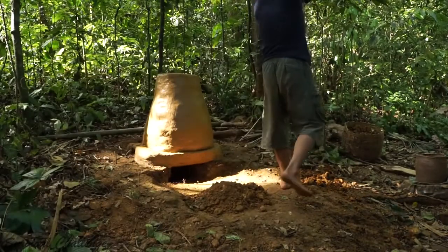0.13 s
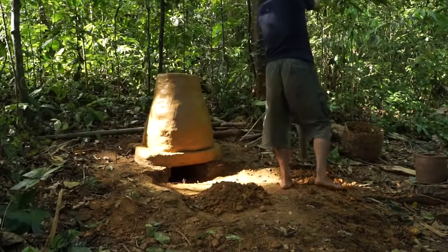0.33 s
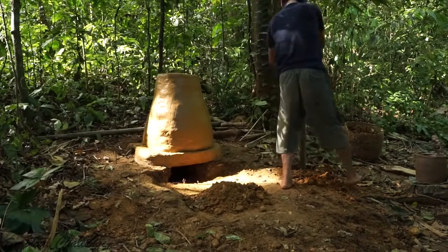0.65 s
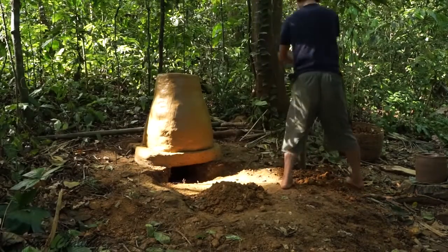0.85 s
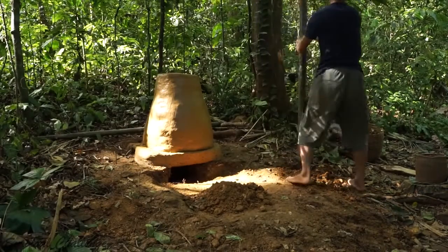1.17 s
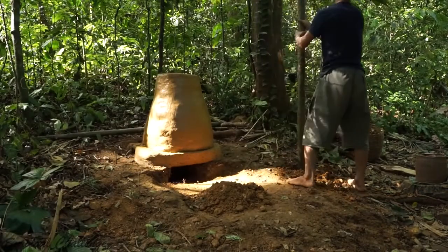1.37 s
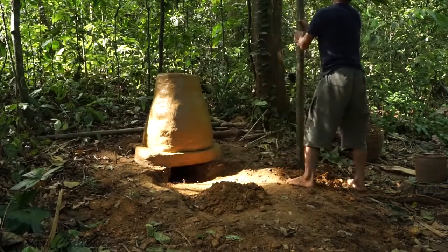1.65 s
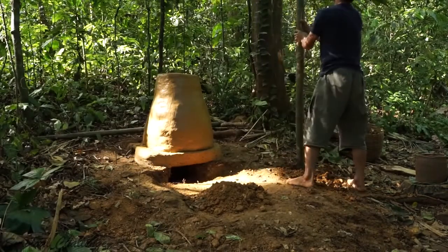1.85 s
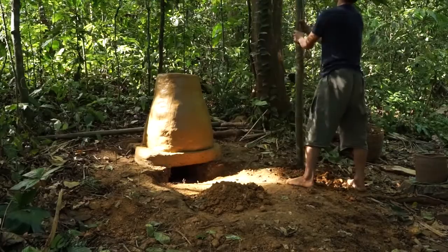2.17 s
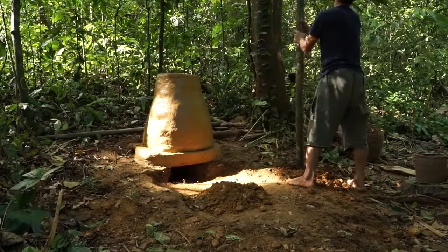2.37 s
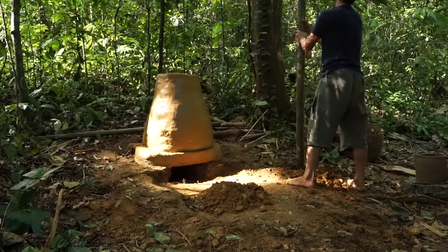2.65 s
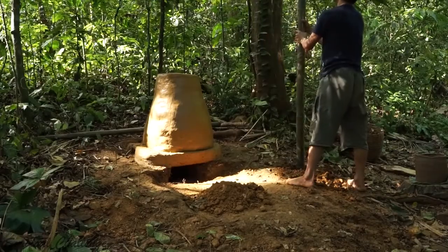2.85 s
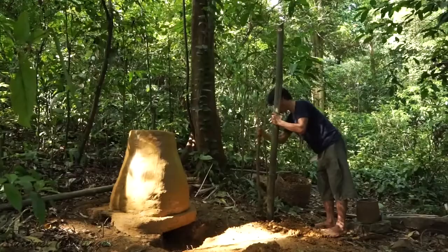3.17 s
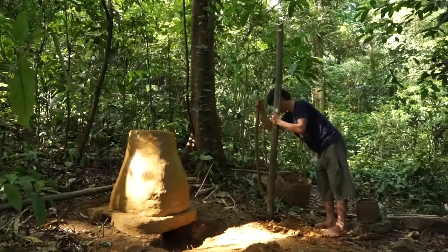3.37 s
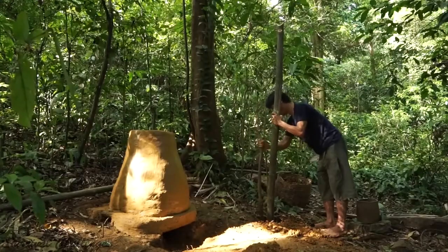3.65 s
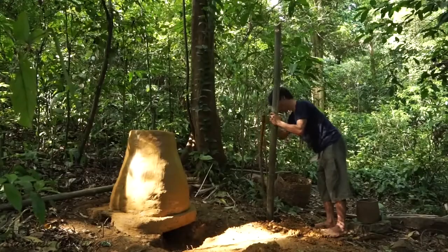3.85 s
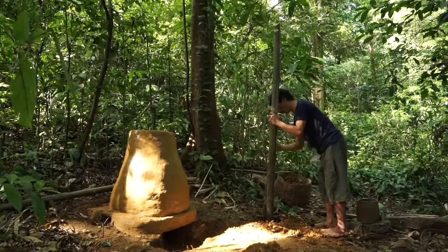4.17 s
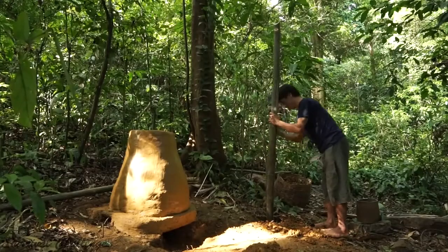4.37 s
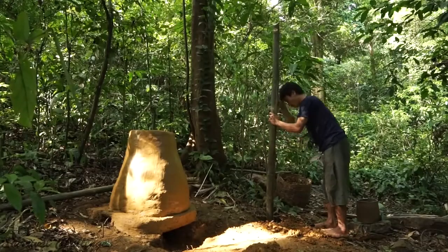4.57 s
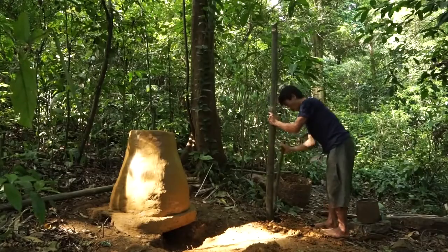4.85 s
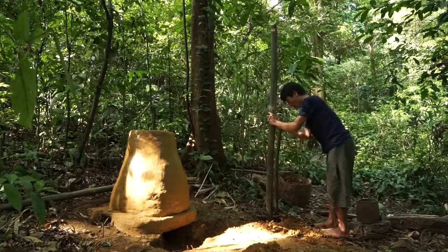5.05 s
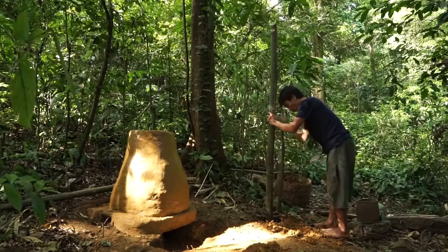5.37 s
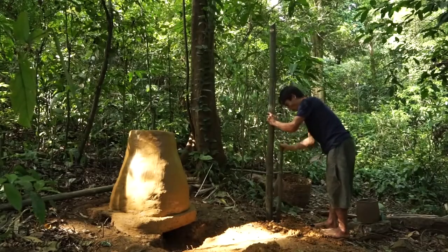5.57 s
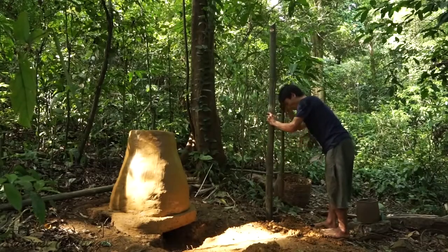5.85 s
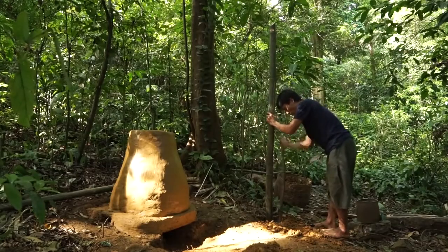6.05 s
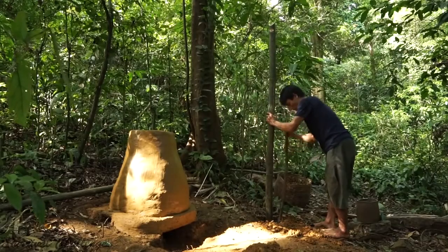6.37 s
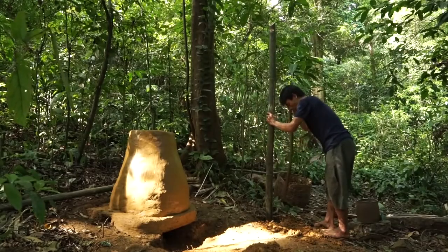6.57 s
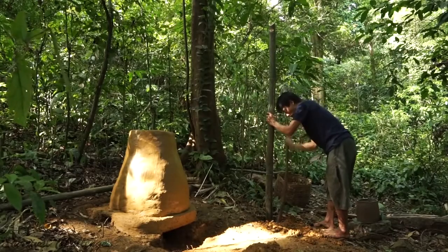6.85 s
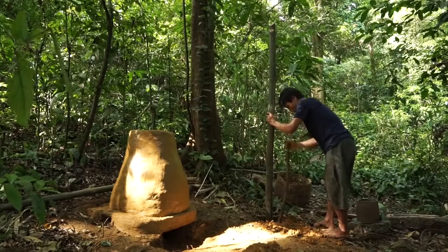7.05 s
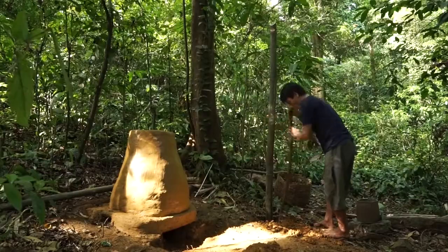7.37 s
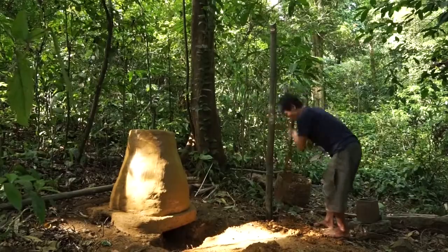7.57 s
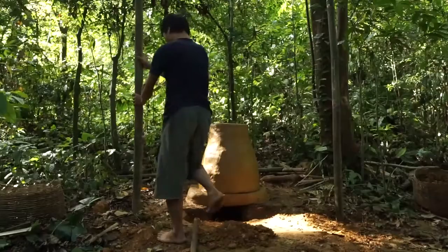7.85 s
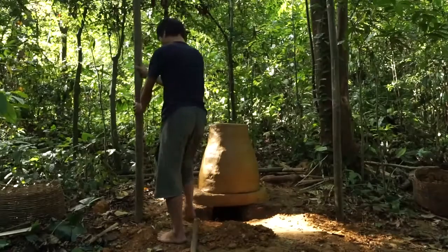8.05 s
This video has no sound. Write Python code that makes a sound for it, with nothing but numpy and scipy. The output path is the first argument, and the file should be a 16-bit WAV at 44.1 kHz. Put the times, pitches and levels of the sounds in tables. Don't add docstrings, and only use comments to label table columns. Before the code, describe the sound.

A wooden pole is rammed into forest soil in irregular, crunchy knocking thuds while cicadas drone steadily all around over a faint low hum.

```python
import sys
import numpy as np
from scipy import signal
from scipy.fft import rfft, irfft, next_fast_len
from scipy.io import wavfile
from scipy.ndimage import uniform_filter1d, map_coordinates

SR = 44100
rng = np.random.default_rng(int(sys.argv[2]) if len(sys.argv) > 2 else 0)


def to_linear_factor(level_db):
    exponent = np.asarray(level_db, float) / 20
    return 10 ** exponent


def master(y):
    cut = np.clip(np.atleast_2d(y).T, -1, 1)
    pcm = np.round(cut * 32767)
    wavfile.write(sys.argv[1], SR, pcm.astype(np.int16))


N = 362502


def unit(x):
    return x / np.sqrt(np.mean(x ** 2) + 1e-20)


def along(points, hz):
    f, v = np.transpose(points)
    return np.interp(np.log(hz + 1), np.log(f + 1), v)


def curves(rows):
    s, *cols = np.transpose(rows)
    return [np.interp(np.arange(N) / SR, s, c) for c in cols]


def wobble(rate):
    knots = rng.standard_normal(int(N * rate / SR) + 4)
    return map_coordinates(knots, [np.arange(N) * rate / SR])


def spell(start, stop, edge):
    t = np.arange(N) / SR
    return np.clip(np.minimum(t - start, stop - t) / edge, 0, 1)


def filtered(x, response):
    m = next_fast_len(x.shape[-1] + 4096)
    return irfft(rfft(x, m) * response(np.fft.rfftfreq(m, 1 / SR)), m)[..., :x.shape[-1]]


def peak(f, hz, width):
    return 1j * f * width / (hz * hz - f * f + 1j * f * width)


def band(hz, width):
    return unit(filtered(rng.standard_normal(N), lambda f: peak(f, hz, width) ** 2))


def rush(spectrum, patchy_db):
    z = signal.stft(rng.standard_normal(N), nperseg=512)[2]
    field = uniform_filter1d(uniform_filter1d(rng.standard_normal(z.shape), 4, 0), 12, 1)
    x = signal.istft(z * to_linear_factor(patchy_db * unit(field)), nperseg=512)[1][:N]
    return unit(filtered(x, lambda f: to_linear_factor(along(spectrum, f))))


def camera():
    # multiple of 50 Hz, level in dB.
    harmonics = [(1, -31.5), (2, -52), (3, -51), (4, -71), (5, -60.5), (258, -66), (259, -67)]
    frame_hz, lag_s = 50, .0089
    turn = 2 * np.pi * frame_hz * (np.arange(N) / SR - lag_s)
    hum = 0
    for k, db in harmonics:
        lag = np.pi / 2 if k > 1 else 0
        hum = hum + np.sqrt(2) * to_linear_factor(db) * np.cos(k * turn - lag)
    rumble = rush([(20, -2), (60, -1), (130, -12.5), (200, -30), (300, -31)], patchy_db=-5.0)
    hiss = filtered(rng.standard_normal((2, N)), lambda f: np.sqrt(1 + 900 / (f + 60) + (f / 11000) ** 2))
    return hum + to_linear_factor(-45.0) * rumble + to_linear_factor(-52.5) * hiss


def far_forest():
    # frequency in Hz, density in dB per Hz.
    murmur = [(120, -16), (170, -1.5), (250, -6.5), (370, -4.5), (600, -7), (876, -6), (1200, -10),
              (1600, -5.5), (2200, -10.5), (2860, -34)]
    return to_linear_factor(-48.5) * rush(murmur, patchy_db=-0.5)


def cicadas():
    # time in seconds, chorus level in dB, singer level in dB.
    loudness = [(0, -31, -37), (.5, -31, -37.5), (1, -32, -39), (1.5, -31, -37.5), (2, -30.5, -34.5),
                (2.5, -30, -35), (3, -30, -30.5), (3.1, -30.5, -48), (3.6, -30.5, -43), (4.2, -30.5, -40),
                (4.8, -31, -47), (5.4, -31.5, -48), (6, -31, -49), (6.6, -31, -44), (7.2, -32.5, -39.5),
                (7.8, -30, -49), (7.9, -27.5, -38), (8.3, -29.5, -43)]
    # frequency in Hz, density in dB per Hz.
    song = [(1180, -56), (2000, -26.5), (2130, -22.5), (2360, -11.5), (2530, -9), (2870, -14.5),
            (3430, -13), (3720, -6), (3920, -10.5), (4220, -21.5), (4700, -1.5), (5060, 1), (6030, -5.5),
            (6550, -15.5), (6900, -35), (8970, -46), (15200, -120)]
    # frequency in Hz, density in dB per Hz.
    overtone = [(6000, -35), (6900, -2.5), (7600, 1.5), (8600, -5.5), (9200, -14), (11000, -21.5),
                (14000, -34), (16000, -34)]
    # frequency in Hz, width in Hz, level in dB.
    body_modes = [
        (2473, 400, -17),
        (3384, 190, -17),
    ]
    click_hz = 106.14
    chorus_db, singer_db = curves(loudness)
    swell_db = 0.13 * wobble(3.67) + 0.37 * wobble(11)
    crowd = rush(song, patchy_db=1.07) + to_linear_factor(-14.0) * rush(overtone, patchy_db=1.0)

    turns = np.arange(int(N / SR * click_hz * 2))
    jitter = 1.5 * abs(3 + wobble(12)[turns * 200])
    at = np.round(turns * SR / (2 * click_hz) + jitter).astype(int)
    sizes = to_linear_factor(2.3 * rng.standard_normal(len(turns)))
    drums = filtered(np.bincount(at, sizes, N), lambda f: peak(f, 4966, 230) ** 2)
    to_and_fro = np.bincount(at, sizes * (-1.) ** turns, N)
    body = filtered(to_and_fro, lambda f: sum(to_linear_factor(db) * peak(f, c, w) ** 2 for c, w, db in body_modes))
    return to_linear_factor(chorus_db + swell_db) * crowd + to_linear_factor(singer_db) * unit(drums + body)


def whistles():
    # frequency in Hz, width in Hz, level in dB, start in seconds, end in seconds.
    tones = [(5087, 54, -41, -0.5, 8.3), (5550, 15, -46, 3, 6.4), (1250, 4, -61.5, -1, 3.4),
             (1650, 21, -59, 6.5, 6.9), (751, 41, -59.5, -0.5, 8.3), (1524, 23, -60, -0.5, 8.3),
             (9670, 150, -61.5, 0, 8.3)]
    return sum(to_linear_factor(db) * spell(a - .05, b, .05) * band(hz, w) for hz, w, db, a, b in tones)


def leaves():
    # start in seconds, end in seconds, level in dB.
    rustles = [
        (0.193, 0.448, -51),
        (1.126, 1.45, -46),
    ]
    crackle = unit(band(8100, 4500) * to_linear_factor(2.1 * wobble(150)))
    return crackle * sum(to_linear_factor(db) * spell(a, b, 0.066) for a, b, db in rustles)


def soil():
    # start in seconds, level in dB, pitch in Hz, 60 dB decay time in seconds.
    thuds = [(.735, -25.5, 250, 0.11), (0.759, -24.5, 66.5, 0.14), (2.938, -33.5, 168, 0.14),
             (3.108, -22, 382, 0.046), (3.65, -29, 164, 0.061), (3.678, -33, 69, .3), (4.14, -42, 197, 0.1),
             (4.244, -31, 213, 0.077), (4.871, -29, 197, 0.11), (4.9, -45, 75, .3),
             (5.531, -41, 200, 0.096), (5.598, -42, 72, 0.33), (5.825, -38.5, 248, 0.13),
             (5.939, -41, 292, 0.051), (6.155, -12.5, 175, 0.07), (6.192, -31, 64.6, 0.28),
             (6.251, -42, 64.7, .2), (6.946, -27, 164, 0.11), (6.969, -40, 76.5, 0.5),
             (7.048, -40, 178, 0.11), (7.322, -37, 244, 0.059), (7.438, -37.5, 195, 0.13),
             (7.471, -41, 146, 0.24), (7.593, -20, 166, 0.093), (7.734, -14, 155, 0.051),
             (7.744, -25.5, 298, 0.037)]
    out, t = np.zeros(N + SR), np.arange(SR // 3) / SR
    sink = t + 0.0039 * (1 - np.exp(-t / 0.008))
    for s, db, hz, t60 in thuds:
        loose = unit(filtered(rng.standard_normal(len(t)), lambda f: peak(f, hz, 0.61 * hz) ** 2))
        fade = to_linear_factor(-60 * t / max(t60, .02)) * (1 - np.exp(-t * hz / 0.62))
        swing = np.sin(2 * np.pi * hz * sink)
        out[round(s * SR):][:len(t)] += to_linear_factor(db + 1) * fade * (swing + 1.44 * loose)
    return out[:N]


def contacts():
    # start in seconds, hold in seconds, level in dB, middle ring in Hz, grit in dB.
    crunches = [(0.7323, 0.017, -22, 1186, -11), (1.685, 0.16, -44, 1177, -23),
                (1.7755, 0.011, -28.5, 1300, -28), (3.091, .022, -16.5, 997, -12),
                (3.302, 0.0046, -31, 1090, -20), (3.648, 0.018, -16, 1087, -10),
                (4.235, 0.0073, -17.5, 1970, -9.5), (4.249, 0.0089, -14.5, 637, -12),
                (4.464, 0.015, -33.5, 1130, -12), (4.851, 0.011, -19.5, 550, -16),
                (4.881, 0.0096, -14.5, 793, -16), (4.971, .013, -32.5, 1177, -22),
                (5.499, 0.02, -27.5, 990, -8.5), (5.514, 0.027, -22, 1115, -21),
                (6.15, 0.036, -22, 607, -10.5), (6.9495, 0.03, -17.5, 875, -5.5),
                (7.5906, 0.012, -45, 520, -26), (7.741, 0.019, -21, 970, -6.5)]
    # time in seconds, level in dB, ring in Hz, crack in dB.
    landings = [(.7284, -8.5, 550, -6), (1.7728, -25, 1420, -25), (3.0883, -15, 2090, 10.5),
                (3.638, -30, 900, -8), (4.2365, -21, 1580, 10.5), (4.8492, -18, 1450, -5),
                (5.5145, -25.5, 1390, -9), (6.1425, -25, 890, -9), (6.933, -26, 895, -3),
                (7.7352, -10.5, 806, -5)]
    # time in seconds, level in dB, ring in Hz, crack in dB.
    jolts = [(0.7299, -12.5, 1650, -8), (.7323, -5.5, 730, -17), (0.7377, -11, 1390, -21),
             (1.7775, -44, 1420, -25), (3.1006, -13, 900, -4), (3.1052, -14, 805, 4.5),
             (3.1094, -17, 366, -8), (3.647, -12, 1340, 8.5), (3.6538, -14, 910, 1), (3.662, -12, 406, 3),
             (4.2461, -17.5, 924, 7), (4.2512, -8, 585, -3), (4.2583, -11, 907, -1), (4.2633, -16, 750, -2),
             (4.872, -9.5, 1600, 4), (4.876, -7, 1890, 2), (4.8805, -10.5, 1250, -8),
             (5.5328, -6.5, 1003, -9.5), (5.5375, -12, 885, -2), (6.1582, -13, 390, -17),
             (6.166, -12, 900, 0.5), (6.176, -14.5, 1000, -10), (6.9379, -12.5, 860, -5),
             (6.9462, -3, 427, -26), (6.9608, -24, 1330, -13), (6.965, -11, 1390, -6),
             (7.7378, -7.5, 870, -8), (7.7461, -14.5, 1070, 5), (7.7524, -7, 856, -0.5),
             (7.7568, -8.5, 1084, -19)]
    gap_s, gap_scatter = .0048, .4
    stop_db, stop_s, settle_db_per_s = 8.5, 0.0028, 586
    loosen_db_per_s = 260

    start, hold, db, hz, grit_db = np.transpose(crunches)[..., None]
    slip, pitch = rng.standard_normal((2, len(crunches), 40))
    steps = np.arange(40)
    t = gap_s * (steps + gap_scatter * np.tanh(slip) * (steps > 0))
    late = np.maximum(t - hold, 0)
    level = db - stop_db * np.tanh(late / stop_s) - settle_db_per_s * late
    ring = np.clip(hz * np.exp(.35 * pitch), 390, 2190)
    knock = np.full_like(t, -11)
    grit = grit_db + loosen_db_per_s * late
    crack = 5.5 + 0.71 * grit
    small = np.stack([start + t, level, ring, knock, crack, grit], axis=-1)
    hard = [(s, d, f, -12.5, c, -28.5 + .5 * c) for s, d, f, c in [*landings, *jolts]]
    return [*hard, *small[level > -58]]


def pole():
    # frequency in Hz, density in dB.
    grit_spectrum = [(3500, -14), (4600, 1), (7000, 3), (10000, -2.5), (14000, -19)]
    out, t = np.zeros(N + SR), np.arange(SR // 16) / SR

    def fade(t60):
        return to_linear_factor(-60 * t / t60) * (1 - np.exp(-t / 0.00042)) ** 2

    dull, bright = band(784, 1420), band(1450, 950)
    knock, crack = band(277.3, 440), band(2840, 1650)
    grit = unit(filtered(rng.standard_normal(N), lambda f: to_linear_factor(along(grit_spectrum, f))))
    for s, db, hz, low_db, crack_db, grit_db in contacts():
        at = slice(round(s * SR), round(s * SR) + len(t))
        body = bright if hz > 1000 else dull
        soft = np.clip((-6.0 - db) / 20, 0, 1)
        ring_t60 = (0.026 + 0.0045 * soft) * min(1, 1050 / hz) ** 0.54
        tone = (1.3 - 0.33 * soft) * np.sin(2 * np.pi * hz * t)
        ring = fade(ring_t60) * (tone + .5 * body[at])
        snap_hz = 3250 + 420 * np.sin(knock[at][0] * 9)
        snap = 0.54 * fade(0.014) * np.sin(2 * np.pi * snap_hz * t)
        thump = to_linear_factor(low_db - 4.0) * fade(0.038) * knock[at]
        split = to_linear_factor(crack_db - 4) * (0.81 * fade(0.026) * crack[at] + snap)
        grind = to_linear_factor(grit_db + 1.5) * fade(0.04) * grit[at]
        out[at] += to_linear_factor(db + 2.0) * (ring + thump + split + grind)
    return filtered(out[:N], lambda f: 1 / (1 + 1j * f / 11000) ** 2)


def trees(x):
    # frequency in Hz, 60 dB decay time in seconds.
    decay = [(100, 0.48), (500, 0.15), (2000, 0.37), (8000, 0.99)]
    out, step = np.zeros(N + SR), SR // 2
    hz, t, z = signal.stft(rng.standard_normal((N // step + 1, SR // 4)), SR, nperseg=256)
    fade = to_linear_factor(-60 * t / along(decay, hz)[:, None])
    tails = signal.istft(z * fade, SR, nperseg=256)[1]
    for i, tail in zip(range(0, N, step), tails):
        wet = signal.fftconvolve(x[i:i + step], tail / np.linalg.norm(tail))
        out[i:][:len(wet)] += wet
    return out[:N]


def scene():
    # time in seconds, gain in dB.
    camera_gain = [(0, 0), (.708, -0.5), (.724, -5.5), (.8, -5.5), (1, -6.5), (2, -6.5), (3.03, -4),
                   (3.05, -0.5), (4.9, -1), (5.2, -1.5), (5.5, -1), (5.6, -2), (6.4, -1.5), (7, 0),
                   (7.7, -1.5), (7.79, -0.5), (7.85, -1), (8.3, 0)]
    blows = pole() + soil()
    steady = cicadas() + whistles() + leaves() + far_forest() + camera()
    return blows + to_linear_factor(-12.5) * trees(blows) + to_linear_factor(curves(camera_gain)[0]) * steady


def top_cut(x):
    return signal.sosfilt(signal.butter(12, 16130, fs=SR, output="sos"), x)


def record(dry):
    # sound stops in seconds, returns in seconds, fade-in in seconds.
    gaps = [
        (3.0296, 3.035, 0.017),
        (7.798, 7.838, 0.012),
    ]
    t, top = np.arange(N) / SR, 1.02
    rounded = dry / (1 + abs(dry / top) ** 8) ** (1 / 8)
    cut = filtered(rounded, lambda f: f < 15770)
    for stop, back, fade in gaps:
        cut = cut * np.where(t < stop, 1, np.clip((t - back) / fade, 0, 1) ** 2.0)
    return top_cut(cut)


dry = scene()
out = record(dry)
master(out)
```